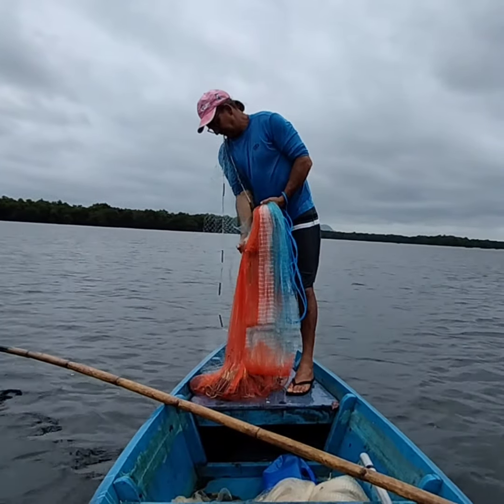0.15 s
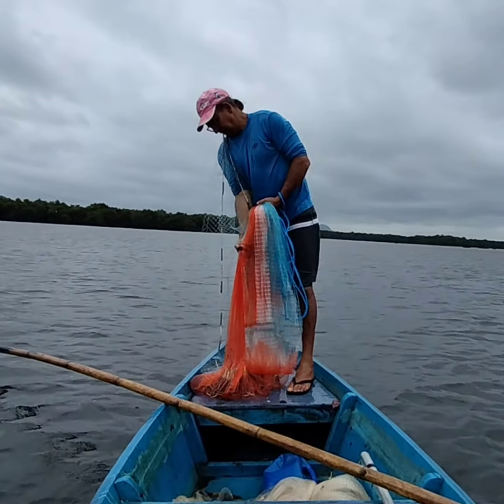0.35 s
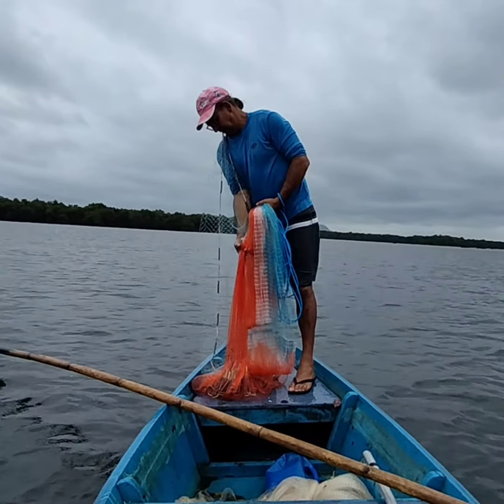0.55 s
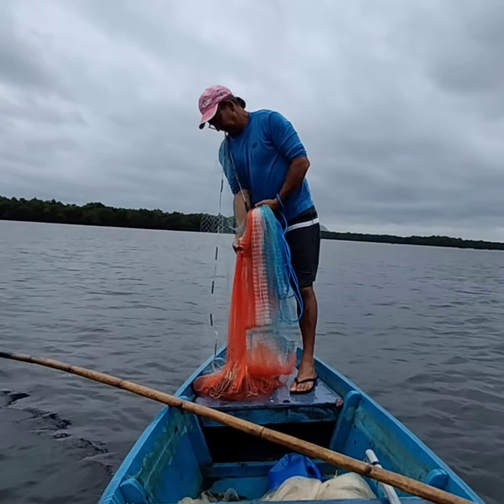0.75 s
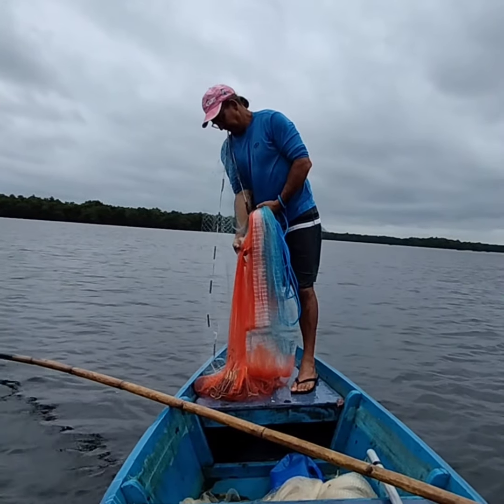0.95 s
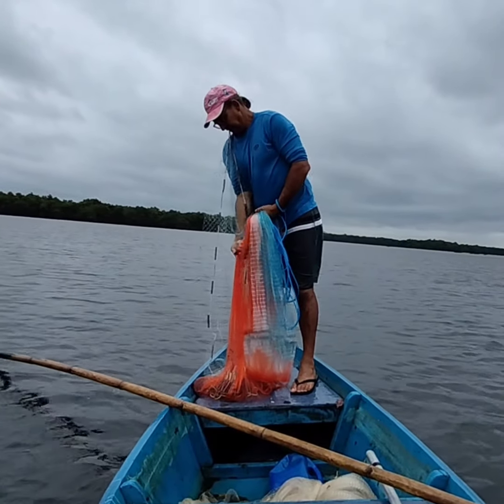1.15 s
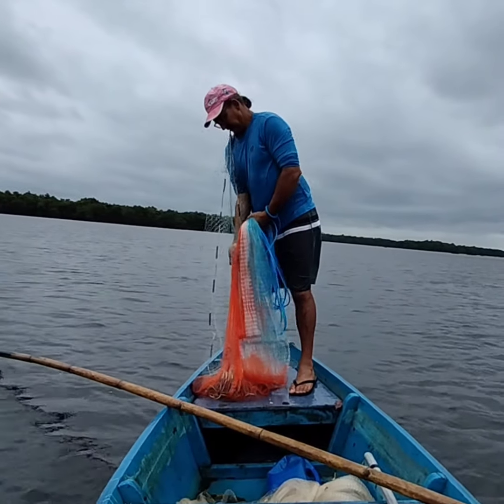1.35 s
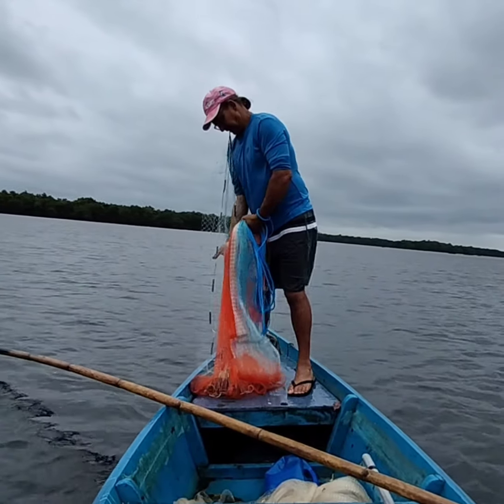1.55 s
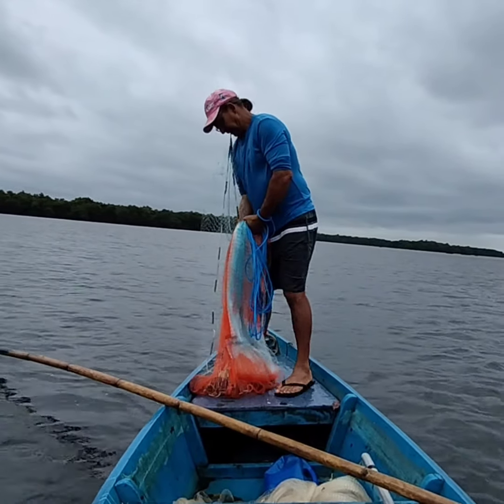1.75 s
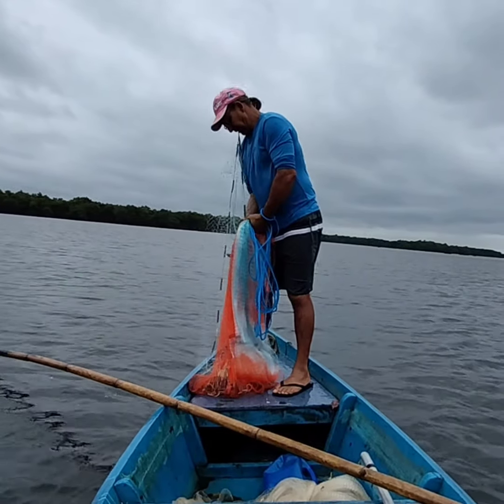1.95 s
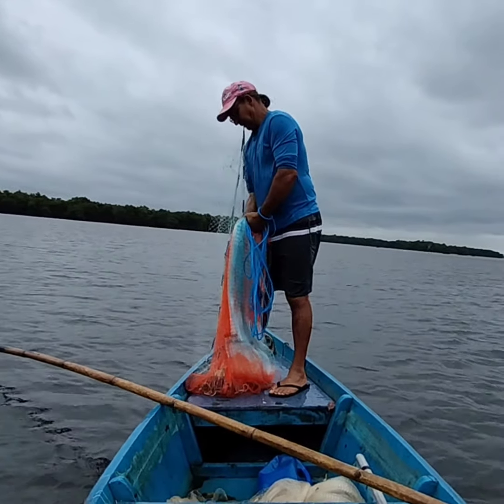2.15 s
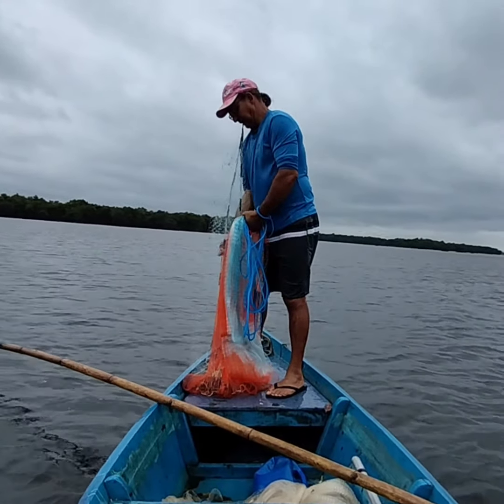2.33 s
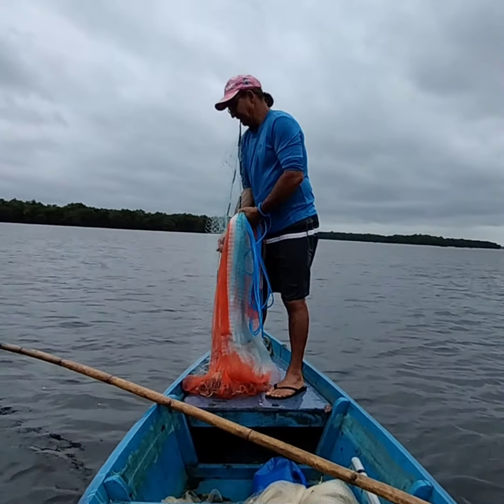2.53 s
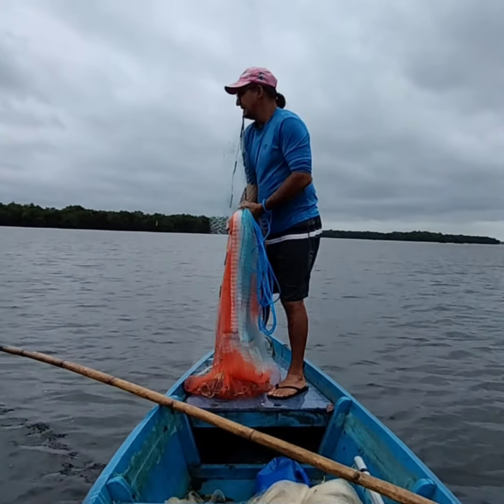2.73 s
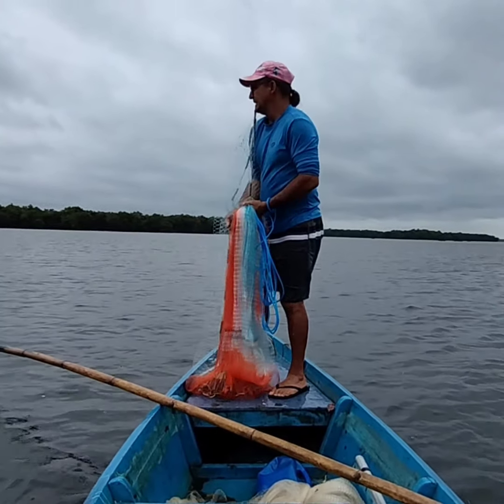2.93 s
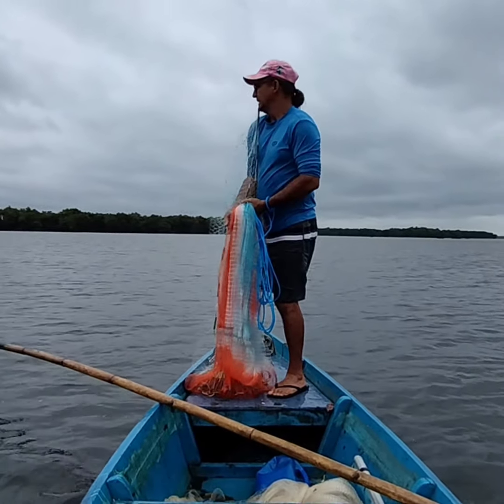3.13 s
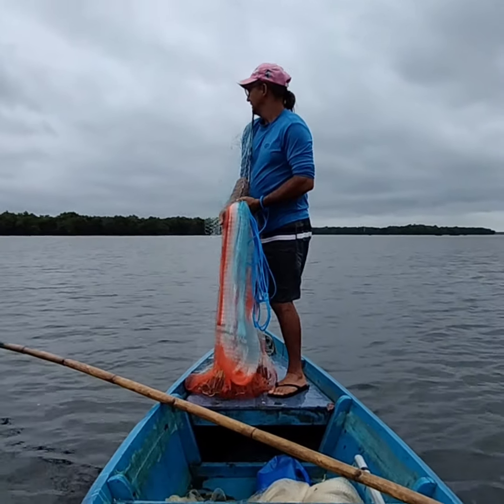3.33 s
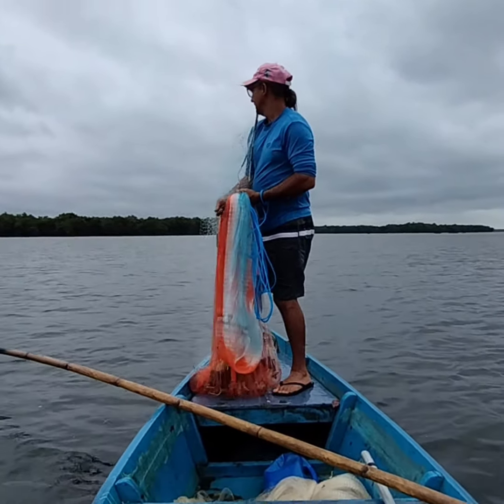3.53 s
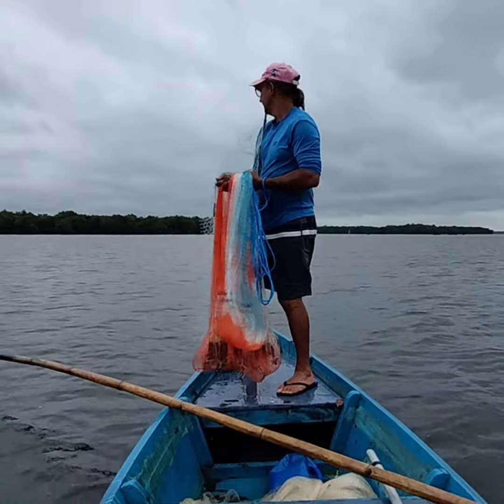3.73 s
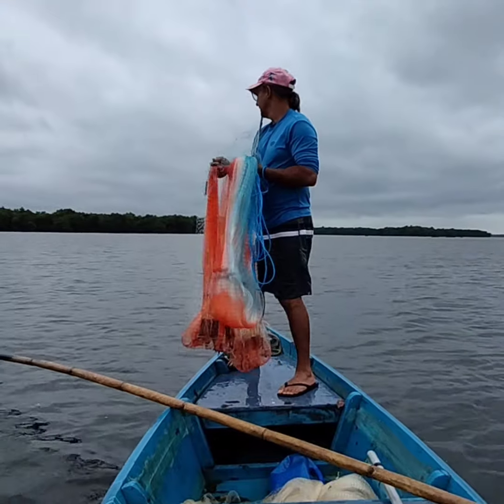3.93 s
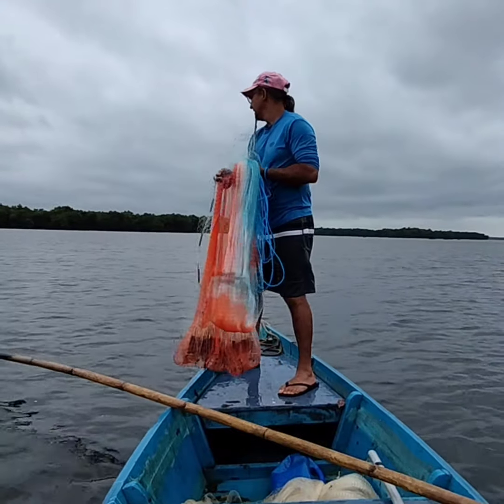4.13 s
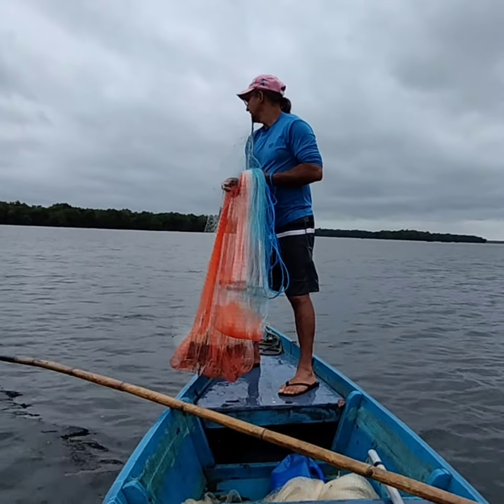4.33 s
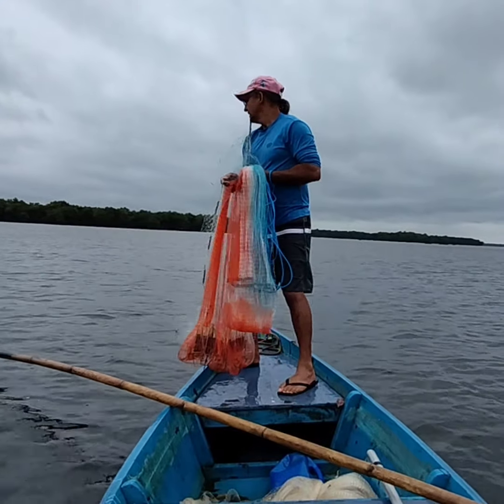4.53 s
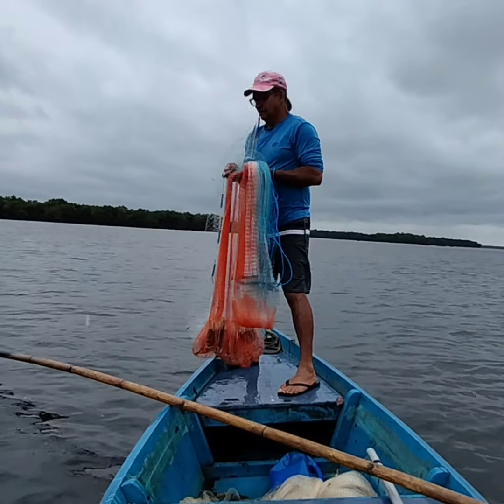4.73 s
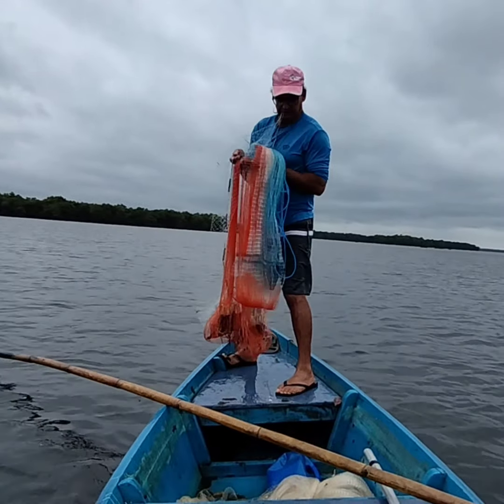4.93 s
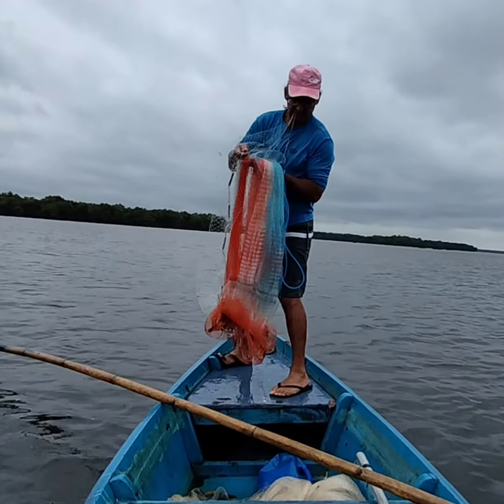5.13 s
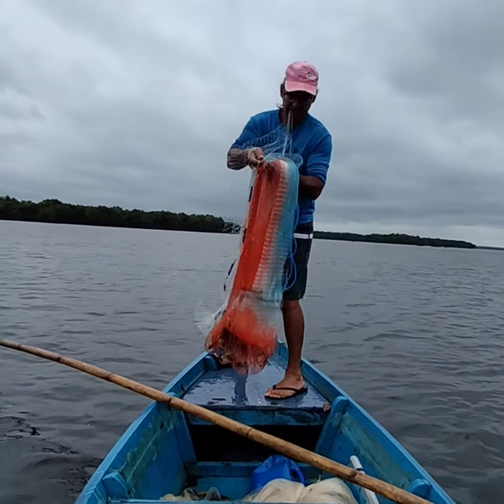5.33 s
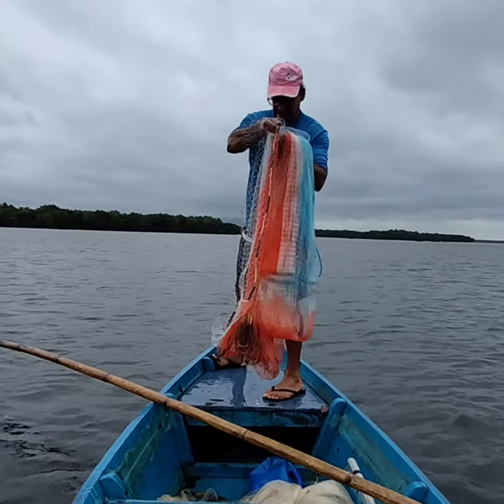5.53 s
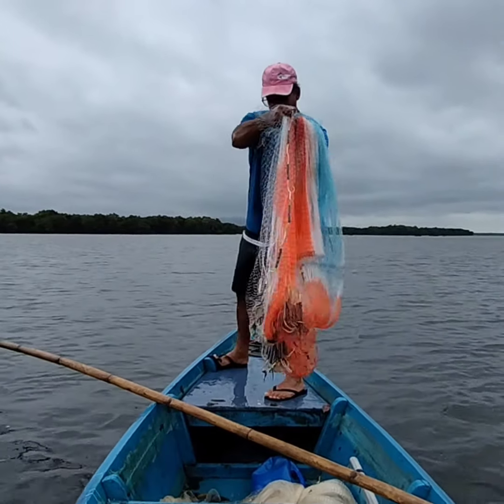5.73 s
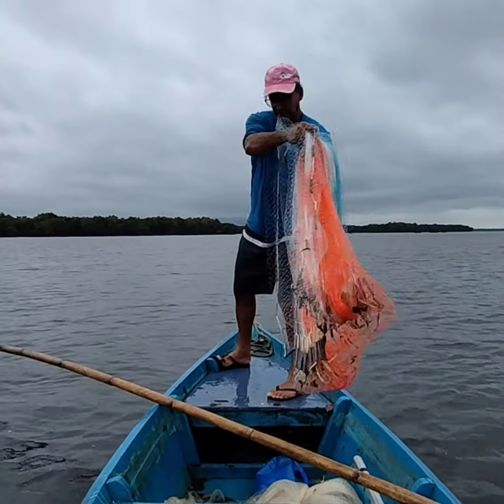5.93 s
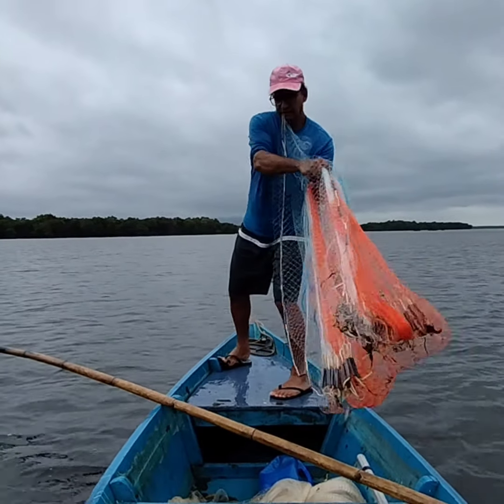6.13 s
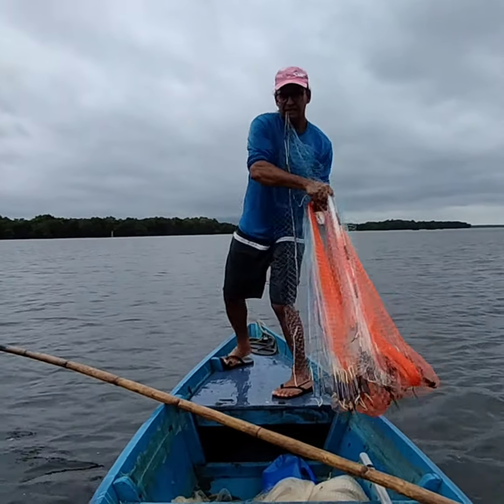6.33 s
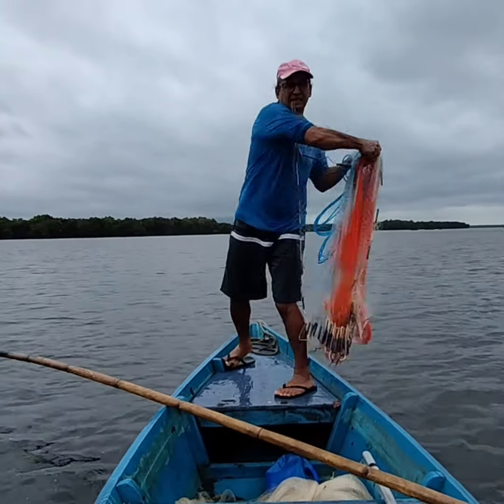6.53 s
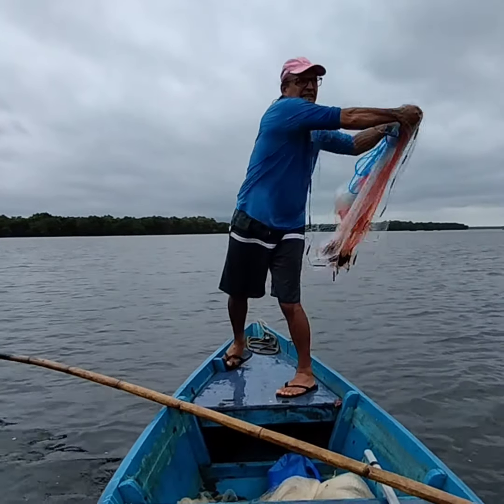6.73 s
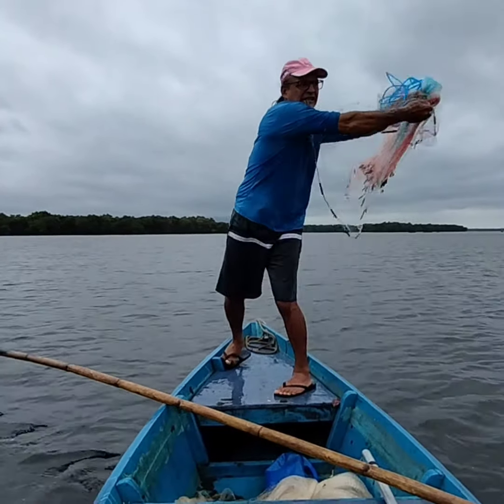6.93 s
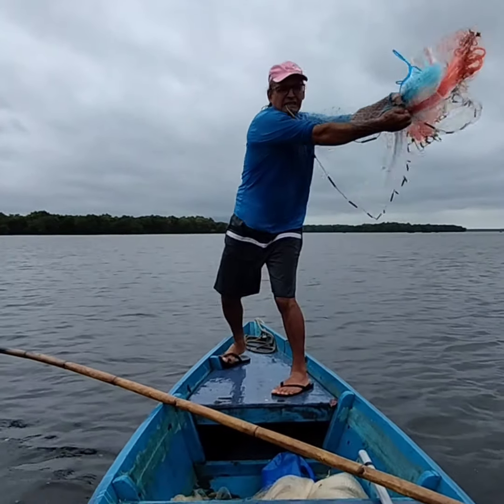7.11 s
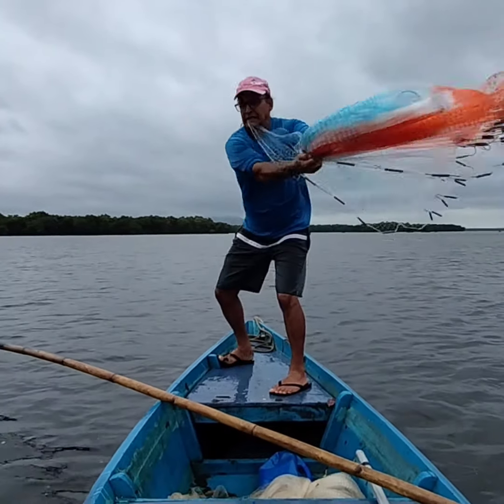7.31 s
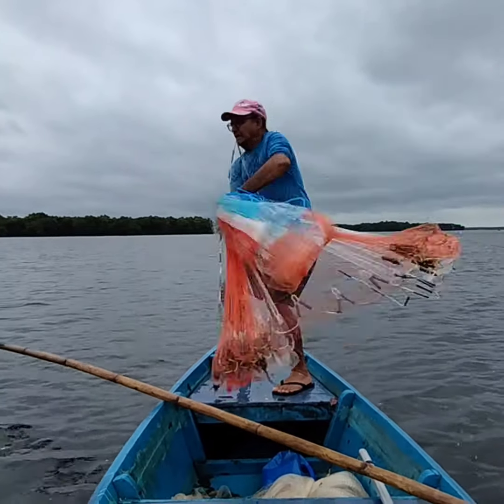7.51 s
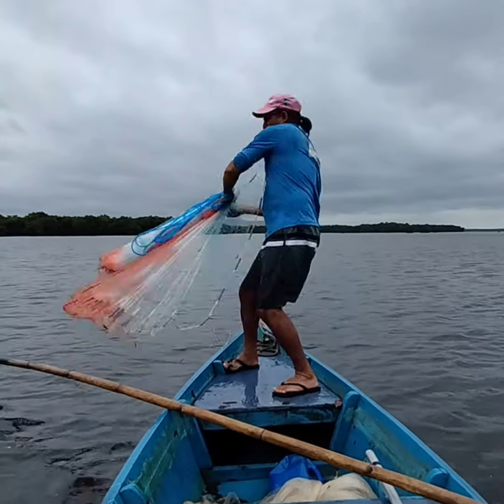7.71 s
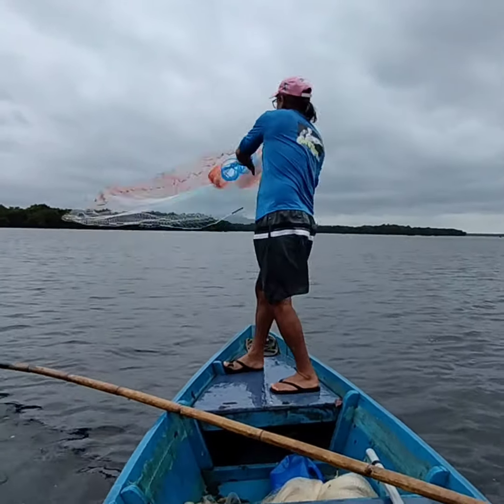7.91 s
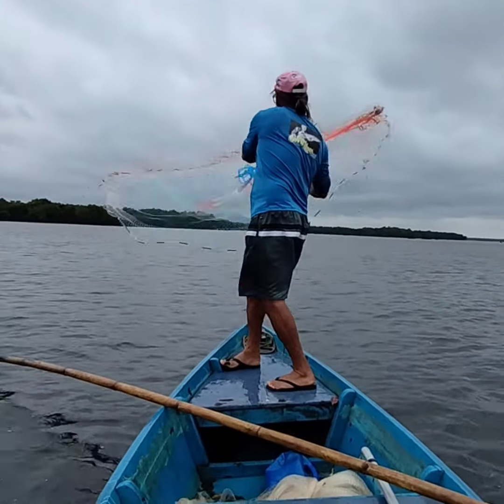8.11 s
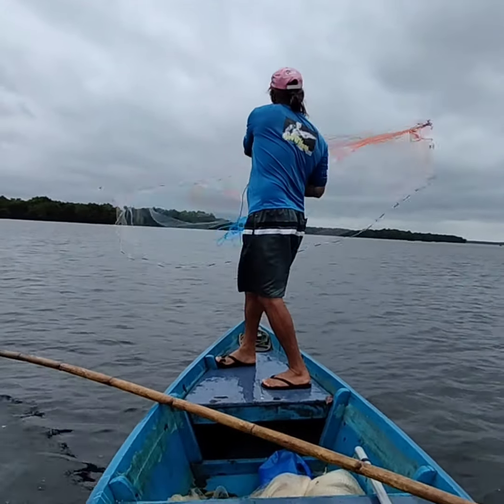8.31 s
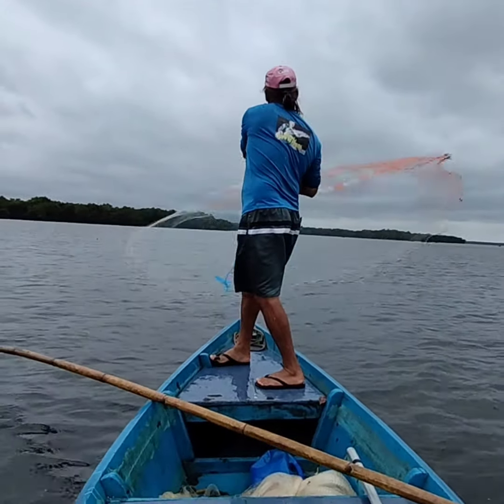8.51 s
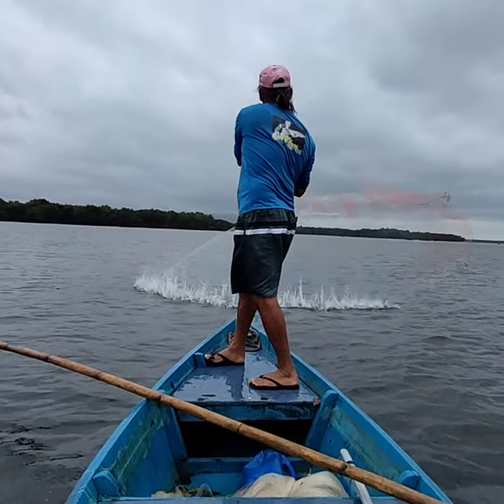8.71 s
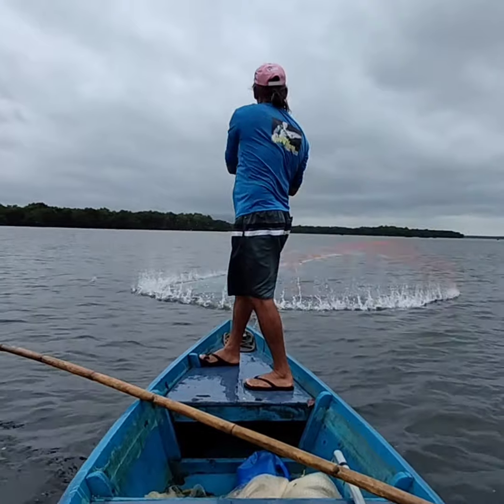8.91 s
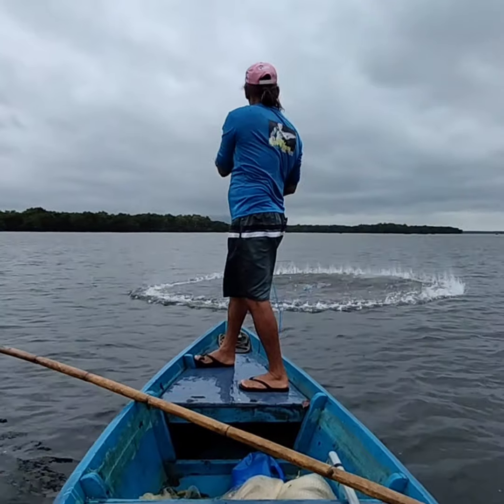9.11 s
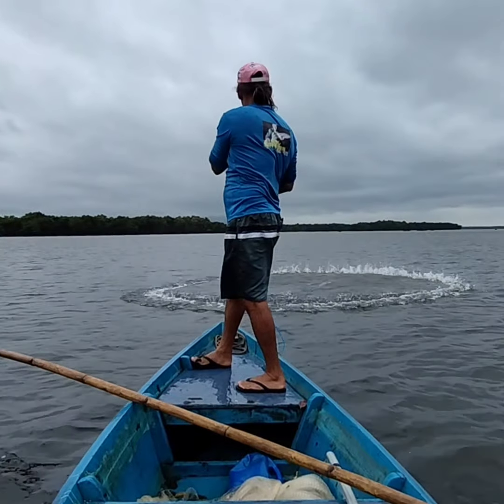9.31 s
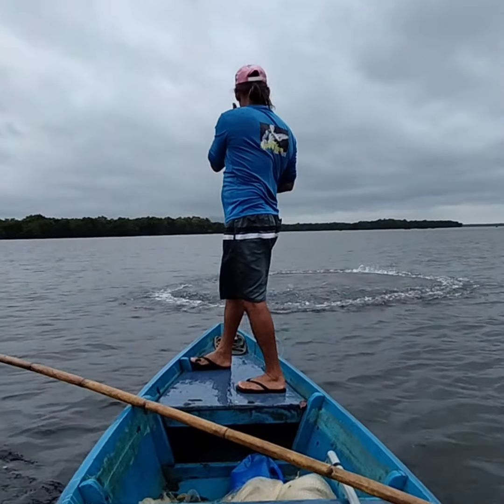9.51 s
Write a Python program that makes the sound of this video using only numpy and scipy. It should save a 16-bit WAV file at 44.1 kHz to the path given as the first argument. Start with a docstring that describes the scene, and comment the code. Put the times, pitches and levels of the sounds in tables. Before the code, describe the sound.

An open estuary heard from a small wooden boat, dry and close, lasting roughly nine and a half seconds. Low wind buffets the microphone throughout, with a hollow wavering drone to the right that swells near 1.3, 3.2 and 7 s and drops away after 8.5. Wet netting drips constantly: crisp ticks on planks, ringing puddle plips and tiny plinks, with gulping air pockets under the hull and occasional lead sinker raps. Mesh rustles softly around 1.5, 3.3 and 6.1 s, with finer hissing near 5 s and a quick trickle at 6.3. A faint distant bird whistles at 2.3 and 7.1. From 7.2 to 8.5 the throw rustles and swishes, with knocks at 7.5, 7.7, 8.06 and 8.4. Drips stop; at 8.75 the rim plunges with bubbly spray, surges again near 9.05, then fades into fizzing foam.

```python
"""A fisherman on the bow of a wooden boat gathers a wet cast net, swings it and throws it over an estuary.
From the start, wind rumbles as noise bands and wavelets wash the hull; drips tick as filtered impacts.
Trapped air rings as rising tones, lead sinkers rap on plank modes and a far bird whistles as gliding sines.
Grains of noise make the mesh rustle in the hands, then hiss through the air in the throw.
Last the weighted rim plunges in as a cloud of ringing bubbles under noisy spray and lingering foam."""
import sys
import numpy as np
from scipy import signal
from scipy.io import wavfile

SR = 44100
rng = np.random.default_rng(int(sys.argv[2]) if len(sys.argv) > 2 else 0)


def wav_out(sig):
    """Save sig, one row per channel (or a flat mono array), as 16-bit PCM at SR to the path in sys.argv[1]."""
    wavfile.write(sys.argv[1], SR, np.round(np.clip(np.atleast_2d(sig).T, -1, 1) * 32767).astype(np.int16))


N = 421596   # length in samples


def from_db(db):
    """Decibels to gain."""
    return 10 ** (np.asarray(db) / 20)


def rms_one(x):
    """Scale to rms 1."""
    return x / np.sqrt(np.mean(x ** 2) + 1e-20)


def peak_one(x):
    """Scale to peak 1."""
    return x / (np.abs(x).max() + 1e-20)


def in_time(rows):
    """One value a sample for each column of a curve."""
    s, *columns = np.transpose(rows)
    return [np.interp(np.arange(N) / SR, s, c) for c in columns]


def at_hz(points, hz):
    """Read a spectrum on a log-frequency axis."""
    table = np.array(points)
    return np.interp(np.log(hz), np.log(table[:, 0]), table[:, 1])


def band(x, low_hz, high_hz):
    """Causal band-pass."""
    edges = [low_hz, min(high_hz, SR / 2 - 1000)]
    return signal.sosfilt(signal.butter(2, edges, "band", fs=SR, output="sos"), x)


def panned(pan_db):
    """Left and right gains of constant power; positive leans left."""
    return rms_one(from_db(np.array([[pan_db], [-pan_db]]) / 2))


def pair(two, alike):
    """Two unrelated signals become left and right with a given likeness."""
    alike = np.clip(alike, -1, 1)
    middle = np.sqrt((1 + alike) / 2) * two[0]
    side = np.sqrt((1 - alike) / 2) * two[1]
    return middle + side * [[1], [-1]]


def drift(rate):
    """Smooth chance with spread 1 at its knots, rate knots a second."""
    knots = rng.standard_normal(N // 100)
    return np.interp(np.arange(N) / SR * rate, np.arange(len(knots)), knots)


def add(out, s, sound):
    """Mix a stereo sound in at a time."""
    i = int(np.clip(round(s * SR), 0, N - 1))
    out[:, i:i + sound.shape[1]] += sound[:, :N - i]


def dying(t, t60):
    """Exponential decay, 60 dB down after t60 seconds."""
    return np.exp(-np.log(1000) * t / max(t60, 1e-4))


def swell(s, half_length):
    """A smooth rise and fall of height 1 around a time."""
    return np.exp(-np.minimum(((np.arange(N) / SR - s) / half_length) ** 2, 50))


def while_dripping(per_s):
    """Random times while the wet net hangs over the boat."""
    net_gone_s = 8.35
    times = np.cumsum(rng.exponential(1 / per_s, size=400))
    return times[times < net_gone_s]


def bubble(t, hz, t60, rise):
    """An air pocket rings and climbs in pitch, by the share rise within t60, as it nears the surface."""
    climb = rise * np.minimum(t, t60) * t / (2 * t60)
    return np.sin(2 * np.pi * hz * (t + climb)) * dying(t, t60)


def turbulence(spectrum, likeness, low_hz, high_hz, flicker_db, count):
    """Bands of stereo noise, each flickering by itself; rms 1."""
    out, edges = 0, np.geomspace(low_hz, high_hz, count + 1)
    white = rng.standard_normal((2, 2, N))
    for k, (low, high) in enumerate(zip(edges, edges[1:])):
        hz = np.sqrt(low * high)
        noise = pair(band(white[k % 2], low, high), at_hz(likeness, hz))
        out = out + noise * from_db(at_hz(spectrum, hz) + flicker_db * drift(25))
    return rms_one(out)


# How alike water sounds left and right. Each row: frequency in Hz, likeness from -1 to 1.
WATER_ALIKE = [(250, .9), (550, 0.62), (1000, 0.15), (2000, 0.066), (4000, -0.032), (12000, -0.088)]


def patter(spectrum, per_s, spread_db, grain_t60, wash, count=12):
    """Countless tiny bursts of uneven size over a smooth wash; rms 1."""
    struck = rng.random(N) < per_s / SR
    sizes = from_db(spread_db * np.minimum(rng.exponential(1, N), 3.5)) * struck
    power = signal.lfilter([1], [1, -dying(2 / SR, grain_t60)], sizes ** 2 + 1e-18)
    white = rng.standard_normal((2, 2, N)) * np.sqrt(power / power.mean() + wash ** 2)
    out, edges = 0, np.geomspace(480, 16500, count + 1)
    for k, (low, high) in enumerate(zip(edges, edges[1:])):
        hz = np.sqrt(low * high)
        colour_db = at_hz(spectrum, hz) + 3.3 * drift(140)   # the colour shifts from grain to grain
        out = out + pair(band(white[k % 2], low, high), at_hz(WATER_ALIKE, hz)) * from_db(colour_db)
    return rms_one(out)


# Wind strength at the microphone. Each row: time in seconds, level in dB re the steady breeze.
WIND_STRENGTH = [(0, -3), (0.8, -3), (1.3, 5), (1.8, -4), (2.25, -.5), (2.8, -1.5), (3.15, 3.5),
                 (3.85, -0.5), (4.1, -6), (4.45, -2), (4.68, -7), (4.9, -1.5), (5.6, 1.5), (6.5, 0),
                 (7.08, 3.5), (7.7, -8), (8.4, -7.5), (8.55, -16.5)]
# Gusts that swell the rumble. Each row: centre in seconds, half length in seconds, rise in dB.
RUMBLE_GUSTS = [(0.172, 0.042, 6.5), (0.402, 0.038, 7.5), (1.212, 0.52, 3.5), (2.384, 0.039, 7),
                (3.0, .1, 3.5), (3.32, 0.056, 5.5), (3.694, .08, 2.5), (4.197, 0.08, 9), (4.875, 0.14, 5),
                (5.35, 0.15, 6.5), (6.984, 0.18, 2.5), (8.79, 0.21, 6), (9.5, 0.14, 4.5)]
# Colour of the low buffeting. Each row: frequency in Hz, relative level in dB per Hz.
BUFFET_COLOUR = [(12, -30), (20, 6), (42, 3.5), (162, -9), (231, -24.5), (260, -10), (340, -43),
                 (570, -120)]
# Colour of the higher drone. Each row: frequency in Hz, relative level in dB per Hz.
DRONE_COLOUR = [(120, 3), (170, 0.5), (235, -1.5), (320, -1), (400, -8), (520, -18.5), (800, -30.5),
                (1400, -50)]
# How alike the wind is at both ports. Each row: frequency in Hz, likeness from -1 to 1.
WIND_ALIKE = [(25, 0.11), (100, 0.28), (200, 0.21), (330, 0.43), (1000, 0)]
BUFFET_DB, BUFFET_FOLLOWS = -36, 0.094   # rumble in the steady breeze; share of the wind's swing in dB
DRONE_DB, HOWL_DB = -42.5, -45.5   # in the steady breeze
HOWL_HZ, HOWL_HZ_PER_DB = 315, 5   # the hollow note climbs with the wind
PUFF_S, PUFF_DB, PUFF_HZ, PUFF_HALF_S = 8.6755, -14.5, 150, .0045


def wind():
    """Eddies buffet each microphone port separately; the right one drones with a hollow, wavering note."""
    wind_db, = in_time(WIND_STRENGTH)
    t = np.arange(N) / SR
    gust_db = sum(rise_db * swell(s, half_length) for s, half_length, rise_db in RUMBLE_GUSTS)
    rumble = turbulence(BUFFET_COLOUR, WIND_ALIKE, 18.38, 292.0, flicker_db=2.0, count=8)
    buffet = from_db(BUFFET_DB + BUFFET_FOLLOWS * wind_db + gust_db) * rumble
    drone = turbulence(DRONE_COLOUR, WIND_ALIKE, 121.6, 1330, flicker_db=4.0, count=10) * panned(-17.0)
    waver = drift(65) + 1j * drift(65)   # wavers in level and phase
    cycles = np.cumsum(HOWL_HZ + HOWL_HZ_PER_DB * wind_db) / SR
    howl = rms_one(np.real(waver * np.exp(2j * np.pi * cycles))) * panned(-56)
    tones = from_db(wind_db) * (from_db(DRONE_DB) * drone + from_db(HOWL_DB) * howl)
    # one eddy thumps the left microphone port
    puff = from_db(PUFF_DB) * np.cos(2 * np.pi * PUFF_HZ * (t - PUFF_S)) * swell(PUFF_S, PUFF_HALF_S)
    return buffet * panned(0.43) + tones + puff * panned(24.4)


# Smooth wash of wavelets along the hull. Each row: time in seconds, level in dB.
WASH_LEVEL = [(0, -61), (.9, -74), (2.5, -69), (4.6, -69), (5.7, -57), (7.1, -57), (7.7, -63.5),
              (8.5, -60.5)]
# Its colour. Each row: frequency in Hz, relative level in dB per Hz.
WASH_SPECTRUM = [(400, 1.5), (700, -7), (1400, -17), (2500, -24)]


def wash():
    """Wavelets run softly along the hull, as flickering bands of noise."""
    level_db, = in_time(WASH_LEVEL)
    return from_db(level_db) * turbulence(WASH_SPECTRUM, WATER_ALIKE, 380, 2490, flicker_db=2.5, count=6)


# Colour of wet mesh in the hands. Each row: frequency in Hz, relative level in dB per Hz.
RUSTLE_COLOUR = [(290, -31), (500, -2), (676, 0.5), (1240, -9.5), (1510, -9.5), (2130, -5.5), (3380, -15),
                 (6450, -17), (8240, -21), (14200, -32.5), (15500, -44)]
# Colour of mesh hissing through air. Each row: frequency in Hz, relative level in dB per Hz.
SWISH_COLOUR = [(2500, 3), (4500, 2), (6500, 2.5), (9000, -2.5), (12000, -7), (15500, -9.5)]
# The hands gather and swing the mesh.
# Each row: centre in seconds, half length in seconds, rustle level in dB, swish level in dB.
HAND_STROKES = [(1.55, 0.4, -59.5, -70), (2.434, 0.085, -63, -84), (3.25, 0.29, -56, -79),
                (3.627, 0.1, -61, -64.5), (4.955, 0.16, -72, -64), (5.305, 0.22, -77, -62.5),
                (6.086, 0.23, -57.5, -71), (6.612, 0.2, -73, -63), (7.007, 0.1, -54.5, -77)]
# The throw, from the back swing to the net flying clear.
# Each row: time in seconds, rustle level in dB, swish level in dB.
THROW_LEVELS = [(7.2, -75.5, -80.5), (7.33, -57, -61.5), (7.48, -54, -65), (7.69, -62, -53.5),
                (7.85, -52, -53), (8.3, -63, -55.5), (8.43, -57, -54.5), (8.54, -81, -75),
                (8.66, -90.5, -60)]
# Folds of mesh scuffing and whipping off the hands.
# Each row: centre in seconds, level in dB, pitch in Hz, half length in seconds, left over right in dB.
MESH_FOLDS = [(1.41, -55, 2600, 0.028, 3), (1.604, -47, 1210, 0.0089, 2), (3.275, -52, 1090, 0.034, -4),
              (7.885, -48.5, 2800, 0.032, -6), (8.229, -45.5, 9500, 0.014, 0), (8.3, -50, 4520, 0.005, -1),
              (8.346, -52, 5000, 0.0077, -6), (8.44, -52, 1150, .03, 0)]
RIPPLE_DB, IDLE_SWISH_DB = -58, -80   # rippling water and the hanging net


def mesh():
    """Wet twine rustles with each stroke of the hands and hisses as it flies open."""
    idle = from_db([[RIPPLE_DB], [IDLE_SWISH_DB]])
    rustle_power, swish_power = from_db(in_time(THROW_LEVELS)) ** 2 + idle ** 2
    for s, half_length, rustle_db, swish_db in HAND_STROKES:
        stroke = swell(s, half_length)
        rustle_power = rustle_power + stroke * from_db(rustle_db) ** 2
        swish_power = swish_power + stroke * from_db(swish_db) ** 2
    coarse = patter(RUSTLE_COLOUR, per_s=190, spread_db=4.7, grain_t60=0.026, wash=0.46)
    fine = patter(SWISH_COLOUR, per_s=4500, spread_db=6.0, grain_t60=0.0065, wash=0.56)
    out = np.sqrt(rustle_power) * coarse * panned(-0.13) + np.sqrt(swish_power) * fine * panned(0.46)
    t = np.arange(SR // 4) / SR
    middle = t.mean()
    for s, level_db, hz, half_length, pan_db in MESH_FOLDS:
        grain = from_db(4 * drift(300)[:len(t)])
        scuff = rms_one(band(grain * rng.standard_normal((2, len(t))), hz * 0.5, hz * 1.25))
        whip = scuff * np.exp(-((t - middle) / half_length) ** 2)
        add(out, s - middle, from_db(level_db) * whip * panned(pan_db))
    return out


PLINKS_PER_S, PLINK_DB = 19, -61   # the level is that of the smallest, lowest drop


def drizzle():
    """Small drops plink into the water and the puddle on deck, each a short rising ring."""
    out, t = np.zeros((2, N)), np.arange(SR // 20) / SR
    times = while_dripping(PLINKS_PER_S)
    for s, (pitch, size, side) in zip(times, rng.random((len(times), 3))):
        hz = 1100 * 3.2 ** pitch
        gain = from_db(PLINK_DB + 7.2 * size ** 2 - 4 * pitch)
        add(out, s, gain * bubble(t, hz, 42 / hz, rise=0.082) * panned(12 * (side - .5)))
    return out


# Drops that land in the puddle and ring.
# Each row: start in seconds, level in dB, pitch in Hz, left over right in dB.
PUDDLE_DROPS = [(.045, -44, 1680, 0), (.215, -39, 1140, 6), (.515, -44.5, 1590, 0), (.650, -40.5, 2780, 6),
                (.687, -37, 1750, 4), (.6955, -39.5, 4470, 4), (1.101, -41, 1380, -2),
                (2.002, -40, 1420, .5), (2.8264, -35.5, 1640, -1), (2.832, -36, 1650, -1),
                (2.9865, -34, 4970, -2), (3.501, -40, 7700, 0), (4.141, -43, 2390, 0),
                (4.3862, -32, 2300, 0), (4.502, -33, 2300, -4), (4.923, -29.5, 2150, 1),
                (5.033, -35.5, 1910, 5), (5.345, -38, 2450, 0), (5.395, -44, 2580, 0),
                (5.539, -40, 5930, -1), (6.1427, -32, 4630, 1), (6.56, -45, 2650, 0), (6.58, -41, 6350, 0),
                (6.672, -38, 6000, -3), (6.9448, -35, 2650, -5)]
PLIP_CYCLES, PLIP_ECHO_S = 18, 0.00353   # cycles to fall 60 dB; longest echo delay
PLIP_TAIL_DB, PLIP_CLICK_DB = -10, -3.5   # re the ring


def plips():
    """A drop rings briefly, returns off the planks close by and leaves a faint tail at the same pitch."""
    out, t = np.zeros((2, N)), np.arange(SR // 16) / SR
    for s, level_db, hz, pan_db in PUDDLE_DROPS:
        ring = bubble(t, hz, PLIP_CYCLES / hz, rise=.06)
        delays = (rng.random((2, 2)) * PLIP_ECHO_S * SR).astype(int)   # two echoes on each side
        echoes = np.array([sum(np.roll(ring, delay) for delay in side) for side in delays])
        noise = rng.standard_normal((2, len(t)))
        tail = peak_one(band(noise * dying(t, 0.07), hz * 0.77, hz * 1.4))
        click = peak_one(band(noise * dying(t, 0.028) + 4 * (t == 0), 800, 9000))
        plip = peak_one(ring + .35 * echoes) + from_db(PLIP_TAIL_DB) * tail + from_db(PLIP_CLICK_DB) * click
        add(out, s, from_db(level_db) * plip * panned(pan_db))
    return out


SPLAT = 0.087   # noise in the impact, before a random factor
DRIP_RING_DB, DRIP_RING_CYCLES = -14, 55   # the tiny bubble that a drip leaves


def tick(body_db, spatter_db, ring_hz, count=4):
    """A sharp impact, its echoes off the planks, a short ring, a woody body, fine spatter and a tiny bubble."""
    t = np.arange(SR // 10) / SR
    noise = rng.standard_normal((3, 2, len(t)))
    splat = SPLAT * (0.64 + rng.random())
    impact = noise[0] * splat * (dying(t, .016) + .22 * dying(t, .09))
    impact[:, 0] += 1.3
    for delay, strength in rng.random((count, 2)):
        impact[:, int(delay * .004 * SR)] += 0.77 * (2 * strength - 1)   # echoes within 4 ms
    crack = peak_one(band(impact, 860, 3800))
    ring = peak_one(band(impact + .12 * noise[1] * dying(t, .02), ring_hz * .86, ring_hz * 1.15))
    body = peak_one(band(impact + 0.19 * noise[1, 0] * dying(t, 0.058), 360, 1030))
    droplets = impact + 2.0 * splat * noise[2] * dying(t, 0.037)
    spatter = peak_one(band(band(droplets, 4200, 14000), 2870, 7500))
    plink = from_db(DRIP_RING_DB) * bubble(t, ring_hz, DRIP_RING_CYCLES / ring_hz, rise=0.13)
    hit = from_db(3.0) * crack + from_db(-2.0) * ring
    return hit + from_db(body_db + 5.0) * body + from_db(spatter_db + 11.5) * spatter + plink


# The loudest drips and wet slaps of the rim.
# Each row: start in seconds, level in dB, body trim in dB, spatter trim in dB, ring in Hz,
# left over right in dB.
LOUD_DRIPS = [(.099, -43.5, -14, -9.5, 2300, -2), (.175, -38.5, -9, -17, 1660, -1),
              (.306, -46.5, -4, -13, 2400, -1), (.398, -36.5, -5, -17, 2020, 0),
              (0.4716, -43.5, -9, -11, 2210, 2), (0.7353, -45.5, 0, -10, 1420, 1),
              (.747, -45, -4, -3.5, 1440, 1), (0.753, -50, -12, -3, 4400, 1),
              (.9293, -42, 2.5, -12, 1570, 1), (1.122, -42, -1.5, -13, 2350, -14),
              (1.296, -46, -11, -11, 1380, 0), (1.374, -43.5, -2.5, -6, 1820, 1),
              (1.4015, -36.5, -11, -23, 1540, -3), (1.42, -39.5, -3.5, -9, 3800, 1),
              (1.56, -44.5, -14, -12, 3020, 3), (1.722, -45, -11, -12, 2180, -2),
              (1.803, -44, -11, -16, 1910, -2), (1.844, -47.5, -18, -8, 1470, 5),
              (1.8665, -40.5, -4, -17, 1590, -2), (2.099, -39.5, -4, -21, 2330, -7),
              (2.1505, -44, -5, -0.5, 1600, -2.5), (2.2077, -48.5, -14, 1.5, 1280, 10),
              (2.355, -43, -14, -27, 1650, 1), (2.462, -44, -6.5, -13, 1580, 0),
              (2.573, -44.5, -4, -14, 2300, 0), (2.653, -40.5, 1, -18, 1560, -5),
              (2.7836, -40.5, 0, -18, 1580, -1), (2.9199, -36, -7, -10.5, 1580, -0.5),
              (2.9779, -36, -6, -16, 4740, -1), (3.308, -46, -6.5, -11, 2400, -2),
              (3.3887, -37, -5, -12.5, 1840, -4), (3.417, -42, -6, -13, 1750, -2),
              (3.535, -44.5, -10, -3.5, 4900, 1), (3.5937, -41, -11, -8, 5330, 5),
              (3.642, -45.5, -4.5, -12, 2000, -3), (3.689, -41, -6, -8.5, 2420, 0),
              (3.959, -41.5, -3, -10.5, 1650, -1.5), (4.42, -35, -21, -19, 2030, -1.5),
              (4.5245, -36, -23.5, -19, 2280, -2), (4.731, -39, -1, -16, 2220, -1),
              (4.842, -44.5, -5, -13, 1900, -0.5), (5.055, -43.5, -8, -20, 2100, 0),
              (5.128, -36, -2, -13, 1490, 8), (5.266, -43, -5, -18, 1880, -1),
              (5.4434, -41, 0.5, -6.5, 1400, -3), (5.8367, -32.5, -2, -14.5, 2450, -2),
              (5.986, -47, -12, -6.5, 2680, 3), (6.009, -43, -20, -15, 2320, -5),
              (6.0693, -36, -1.5, -19, 1700, 0), (6.109, -44, -15.5, -5, 1310, 2.5),
              (6.239, -44, -18, -9, 2600, 0), (6.449, -43, -13, -10, 1500, 0),
              (6.481, -41.5, -13.5, -28, 2750, -7.5), (6.697, -44, -10, -19, 2490, -2),
              (6.727, -45, 3, -6, 2590, -6), (6.789, -40.5, -15, -16, 3500, 0),
              (6.8582, -39.5, 3, -8, 1920, 13), (6.8847, -39.5, -14, -8, 1500, -1),
              (7.05, -40, -3, -14, 1700, 1), (7.2938, -42, -5, -25, 2300, 0.5),
              (7.306, -39, -7, -18, 1990, -2), (7.418, -39.5, -6, -24, 1620, -2),
              (7.552, -45.5, -22, -0.5, 2330, -2), (7.6768, -38.5, -19, -12, 1560, -5),
              (7.87, -40.5, 4, -24, 1590, 1), (8.001, -47, -3.5, -5.5, 3970, -3),
              (8.016, -44, -5, -15, 1900, -0.5), (8.036, -39.5, -5.5, -7, 1670, -4.5),
              (8.0565, -41.5, 3, -25, 1560, 5)]
DRIPS_PER_S, DRIP_DB, DRIP_SPREAD_DB = 2.9, -49.5, 1   # fainter drips at random
DRIP_BODY_DB, DRIP_SPATTER_DB, DRIP_HZ = -8, -12, 1970   # their typical trims and ring


def ticks():
    """Heavy drips and wet mesh hit the deck, with fainter drips between them."""
    out = np.zeros((2, N))
    for s, level_db, body_db, spatter_db, ring_hz, pan_db in LOUD_DRIPS:
        add(out, s, from_db(level_db) * tick(body_db, spatter_db, ring_hz) * panned(pan_db))
    for s in while_dripping(DRIPS_PER_S):
        size, body, wet, pitch, side = rng.standard_normal(5)
        drip = tick(DRIP_BODY_DB + 5 * body, DRIP_SPATTER_DB + 3 * wet, DRIP_HZ * np.exp(.3 * pitch))
        add(out, s, from_db(DRIP_DB + DRIP_SPREAD_DB * size) * drip * panned(4 * side))
    return out


# Air pockets trapped by wavelets under the hull and by the plunging rim.
# Each row: start in seconds, level in dB, pitch in Hz, t60 in seconds, left over right in dB.
AIR_POCKETS = [(.166, -28.5, 368, 0.027, 1), (.168, -34, 610, 0.026, 2), (0.187, -35.5, 458, 0.082, 3),
               (.399, -39, 706, 0.027, 1), (.930, -38.5, 680, 0.042, 3), (1.385, -35.5, 750, 0.035, 5),
               (1.401, -36, 610, 0.048, 2), (1.683, -28.5, 247, 0.14, 7), (1.695, -27.5, 195, 0.086, 4),
               (2.003, -41.5, 640, 0.027, -2), (2.333, -32, 614, 0.026, 23), (3.391, -33, 686, 0.044, 2.5),
               (3.418, -36.5, 755, 0.066, 2), (3.42, -41, 954, 0.04, 2), (3.522, -36, 650, 0.06, 1),
               (3.528, -35, 440, 0.11, 0), (3.861, -45, 775, .04, 2), (4.778, -43, 890, .04, 0),
               (4.883, -40, 860, .03, 7), (4.923, -36, 640, 0.045, -0.5), (5.053, -46, 754, 0.028, 0),
               (5.153, -28.5, 347, 0.088, 0), (5.828, -38, 702, 0.037, -0.5), (6.358, -38.5, 600, 0.037, 1),
               (6.483, -40, 686, .03, -2), (7.05, -37, 923, 0.037, 2), (7.095, -34, 664, 0.042, 3),
               (8.008, -34.5, 435, 0.071, 2), (8.184, -42, 585, 0.095, 2), (8.23, -42, 840, 0.044, -4),
               (8.787, -27, 460, 0.078, 1), (8.818, -22.5, 495, 0.091, 1), (8.835, -23, 370, 0.036, 5),
               (8.887, -22.5, 528, 0.06, 3), (8.927, -30, 313, .06, 1), (8.975, -31, 479, 0.15, 0),
               (9.006, -33, 330, 0.035, 0), (9.028, -27.5, 397, 0.046, 0), (9.038, -31, 703, 0.078, -3),
               (9.058, -29.5, 788, 0.075, 0), (9.066, -30, 292, 0.037, 0), (9.087, -30, 300, 0.05, 0),
               (9.09, -28, 560, 0.074, -1), (9.108, -28, 640, 0.088, 0), (9.138, -26, 386, 0.04, 2),
               (9.14, -26, 638, .06, -2), (9.125, -31, 600, 0.089, 2), (9.155, -24.5, 508, 0.078, 3),
               (9.198, -26.5, 460, 0.12, 4), (9.225, -34, 347, 0.069, 0), (9.253, -25, 274, 0.056, -0.5),
               (9.325, -37, 606, .08, 0.5)]
# Dull knocks on the boat.
# Each row: start in seconds, level in dB, pitch in Hz, t60 in seconds, left over right in dB.
BOAT_KNOCKS = [(0.166, -26.5, 210, 0.052, -2), (3.5, -37, 203.7, 0.11, -24), (3.523, -35, 174, 0.11, 1),
               (8.056, -25.5, 175, 0.19, 4)]
POCKET_RISE = 0.14   # average share by which the pitch climbs
# big, low air pockets swell slowly and ring clean; small ones are mostly slosh
GULP_ATTACK_CYCLES, SLOSH_PER_KHZ = 1.6, .95


def hull():
    """Trapped air rings under a brief slosh; heavier knocks boom in the boat."""
    out, t = np.zeros((2, N)), np.arange(SR // 4) / SR
    for s, level_db, hz, t60, pan_db in AIR_POCKETS:
        noise = rng.standard_normal((2, len(t))) * dying(t, 0.071)
        slosh = peak_one(pair(band(noise, hz * 0.68, hz * 1.7), 0.8))
        attack = 1 - dying(t, GULP_ATTACK_CYCLES / hz)
        pocket = bubble(t, hz, t60, POCKET_RISE * (.5 + rng.random())) * attack
        gulp = 1.3 * pocket + SLOSH_PER_KHZ * hz / 1000 * slosh
        add(out, s, from_db(level_db) * gulp * panned(pan_db))
    for s, level_db, hz, t60, pan_db in BOAT_KNOCKS:
        planks = peak_one(band(rng.standard_normal(len(t)) * dying(t, t60), hz * 0.38, hz * 1.33))
        boom = np.sin(2 * np.pi * hz * t) * dying(t, t60)
        add(out, s, from_db(level_db) * (0.67 * boom + 1.08 * planks) * panned(pan_db))
    return out


# Lead sinkers rap the planks.
# Each row: start in seconds, level in dB, left over right in dB, plank level in dB re the pulse, ring in Hz.
SINKER_RAPS = [(.9599, -35, 1.5, 0.5, 1700), (1.3205, -31.5, -2, -1, 1700), (2.3316, -30.5, -2, -3, 1770),
               (3.824, -36, -2, -4, 2100), (4.329, -30.5, 3, -2, 1960), (4.8824, -35.5, 6, 4, 1700),
               (4.9233, -34.5, 1, 3, 2200), (5.746, -33.5, 0, -2, 1700), (6.9746, -34.5, -3, 6, 1200),
               (7.018, -32, 2, -3, 1300), (7.5, -28.5, -1, -4, 1700), (7.7086, -27, 1, -4.5, 1550),
               (8.383, -24.5, 0.5, 0, 1450)]
# Resonances of a plank, varied at each rap. Each row: pitch in Hz, level in dB, t60 in seconds.
PLANK_RESONANCES = [(560, -5, 0.022), (780, 1, 0.022), (1037, -1, 0.022)]
SINKER_RING_DB, SINKER_TAIL_DB, SINKER_TAIL_S = -1, -11, 0.037   # levels re the pulse; scatter t60


def sinkers():
    """Lead on wood: a clean pulse, a brief ring of the spot struck, the plank's body and scatter in the boat."""
    out, t = np.zeros((2, N)), np.arange(SR // 12) / SR
    click = 1.0 * (t == 0)
    pulse = peak_one(band(click, 810, 5500))
    for s, level_db, pan_db, body_db, ring_hz in SINKER_RAPS:
        plank = 0
        for hz, db, t60 in PLANK_RESONANCES:
            gain = from_db(db + 2 * rng.standard_normal())
            plank = plank + gain * bubble(t, hz * np.exp(.12 * rng.standard_normal()), t60, rise=0)
        plank = peak_one(plank)
        rattle = rng.standard_normal((2, len(t))) * dying(t, SINKER_TAIL_S)
        ring = peak_one(band(click + 0.094 * rattle, ring_hz * 0.71, ring_hz * 1.38))
        scatter = peak_one(band(rattle, 900, 4200))
        rap = pulse + from_db(SINKER_RING_DB) * ring
        rap = rap + from_db(body_db) * plank + from_db(SINKER_TAIL_DB) * scatter
        add(out, s, from_db(level_db) * rap * panned(pan_db))
    return out


# A far shorebird. Each row: start in seconds, length in seconds, starting pitch in Hz, level in dB.
BIRD_WHISTLES = [(2.335, 0.15, 2770, -74), (7.062, 0.17, 2760, -69.5)]
WHISTLE_SAG_HZ_PER_S = 604


def bird():
    """Thin, slightly sagging whistles, fluttering in the wind on their way across the water."""
    out, flutter = np.zeros((2, N)), (drift(70) + 1j * drift(70)) / 2
    for s, length, hz, level_db in BIRD_WHISTLES:
        t = np.arange(int(length * SR)) / SR
        tone = np.exp(2j * np.pi * (hz - WHISTLE_SAG_HZ_PER_S * t / 2) * t)
        note = tone * (1 + flutter[int(s * SR):][:len(t)])
        add(out, s, from_db(level_db) * note.real * np.sin(np.pi * t / length) * panned(0))
    return out


# Wet mesh slides through the fingers with a soft hiss.
# Each row: centre in seconds, half length in seconds, level in dB.
MESH_SLIDES = [(5.1, 0.28, -66), (6.25, 0.38, -68.5)]


def slides():
    """Fine twine slipping over skin hisses in one narrow band."""
    level = sum(from_db(level_db) * swell(s, half_length) for s, half_length, level_db in MESH_SLIDES)
    return level * rms_one(band(rng.standard_normal((2, N)), 5300, 7400))


TRICKLE_S, TRICKLE_LENGTH_S, TRICKLE_HZ, TRICKLE_DB = 6.27, 0.066, 1700, -47   # level of the loudest drop


def trickle(count=14):
    """Water runs off the swinging net in a quick run of drops close in pitch."""
    out, t = np.zeros((2, N)), np.arange(SR // 20) / SR
    for when, pitch, size in rng.random((count, 3)):
        hz = TRICKLE_HZ * 1.6 ** (pitch - .5)
        drop = from_db(TRICKLE_DB - 5.8 * size) * bubble(t, hz, 50 / hz, rise=.1)
        add(out, TRICKLE_S + when * TRICKLE_LENGTH_S, drop * panned(0))
    return out


# The near side of the rim plunges in, then the far side.
# Each row: start in seconds, attack in seconds, hold in seconds, fall in dB per second,
# bubble level in dB, spray level in dB.
RIM_PLUNGES = [(8.768, 0.02, 0.052, 44, -32, -37), (9.042, 0.06, 0.12, 190, -33.5, -41)]
LANDING_S, FOAM_RISE_S = 8.68, 0.077
FIZZ_DB, AFTER_BUBBLES_DB, FIZZ_FALL_DB_PER_S = -41, -48.5, 3.5   # the foam left on the water


def surges():
    """Gains of bubbles and spray: each side of the rim rises, holds and dies away over the lingering foam."""
    t = np.arange(N) / SR
    foam_rise = np.clip((t - LANDING_S) / FOAM_RISE_S, 0, 1)
    foam = foam_rise * from_db(-FIZZ_FALL_DB_PER_S * (t - LANDING_S))
    power = (foam * from_db([[AFTER_BUBBLES_DB], [FIZZ_DB]])) ** 2
    for s, attack, hold, fall_db_per_s, bubbles_db, spray_db in RIM_PLUNGES:
        fall = from_db(-fall_db_per_s * np.maximum(t - s - attack - hold, 0))
        surge = np.clip((t - s) / attack, 0, 1) * fall
        power = power + (surge * from_db([[bubbles_db], [spray_db]])) ** 2
    return np.sqrt(power)


# Colour of the bubble cloud. Each row: frequency in Hz, relative level in dB per Hz.
BUBBLE_COLOUR = [(130, -44), (220, -17), (265, -0.5), (309, 0), (422, -8), (513, 0.5), (834, -6),
                 (935, -12), (1500, -13), (1910, -24), (2600, -14), (3380, -51), (5720, -120)]
# Colour of the spray. Each row: frequency in Hz, relative level in dB per Hz.
SPRAY_COLOUR = [(700, 6), (1400, 10), (2400, 3.3), (3500, -0.5), (6300, -2), (8000, -9.5), (10500, -17),
                (13000, -22.5), (15500, -28.5)]
# Bunches of sinkers smack the water together and throw extra spray.
# Each row: centre in seconds, half length in seconds, rise in dB.
SINKER_BUNCHES = [(8.819, .005, 3), (8.839, 0.0079, 6), (8.872, 0.0058, 3), (9.033, 0.0089, 5.5),
                  (9.26, .008, 3)]
LEAD_S, LEAD_HALF_S, LEAD_DB = 8.738, 0.042, -46   # the first sinkers cut the surface with a thin hiss


def splash(count=2400):
    """Each sinker drags down a cavity that rings as a bubble; spray rains back on the water."""
    bubbling, spraying = surges()
    start, end = 8.6, N / SR
    cloud, t = np.zeros((2, N)), np.arange(SR // 12) / SR
    for when, pitch, size, side in rng.random((count, 4)):
        hz = 240 * (2500 / 240) ** pitch
        # small bubbles are brief and spread over a wide band
        gain = from_db(at_hz(BUBBLE_COLOUR, hz) + 10 * size ** 4) * hz
        lag = (side - .55) * 0.00058   # seconds; the ring of splashes spans left to right
        heard = np.maximum(t + np.array([[lag], [-lag]]) / 2 - abs(lag), 0)
        add(cloud, start + when * (end - start), gain * bubble(heard, hz, 22 / hz, rise=0.1))
    cloud /= cloud[:, round(start * SR):].std()
    spray = patter(SPRAY_COLOUR, per_s=900, spread_db=3.2, grain_t60=0.009, wash=0.95)
    hiss = patter(SWISH_COLOUR, per_s=800, spread_db=2.0, grain_t60=0.006, wash=0.62)
    lead = from_db(LEAD_DB) * swell(LEAD_S, LEAD_HALF_S) * hiss
    bunch_db = sum(rise_db * swell(s, half_length) for s, half_length, rise_db in SINKER_BUNCHES)
    spray = spray * from_db(bunch_db)
    return bubbling * cloud * panned(-3.5) + (spraying * spray + lead) * panned(-3.1)


def scene():
    """All sources sum dry, for open water gives no echo."""
    water_and_wind = wind() + wash() + drizzle() + plips() + hull()
    net = mesh() + ticks() + sinkers() + slides() + trickle() + splash()
    return water_and_wind + net + bird()


def record(dry):
    """The right microphone port has a presence peak, the left more air; the top is cut at 16 kHz."""
    presence = band(dry, 2970, 10300) * np.array([[-.3], [.4]])
    air = band(dry, 7800, 12500) * np.array([[.15], [-.15]])
    top_cut = signal.ellip(10, .2, 80, 16000, fs=SR, output="sos")
    return signal.sosfilt(top_cut, dry + presence + air)


dry = scene()
out = record(dry)
wav_out(out)
```